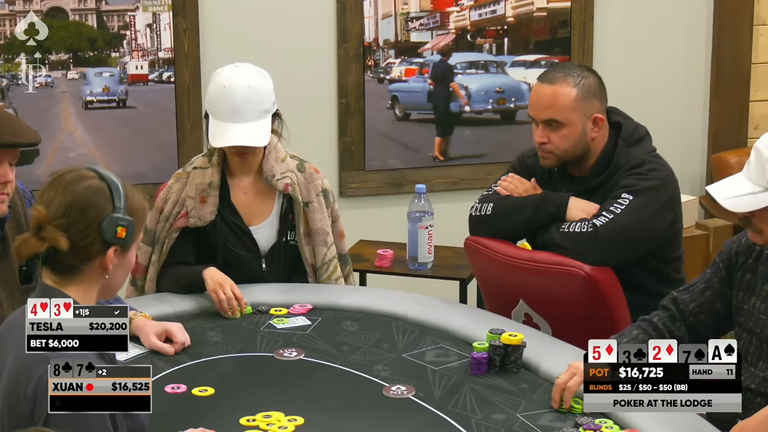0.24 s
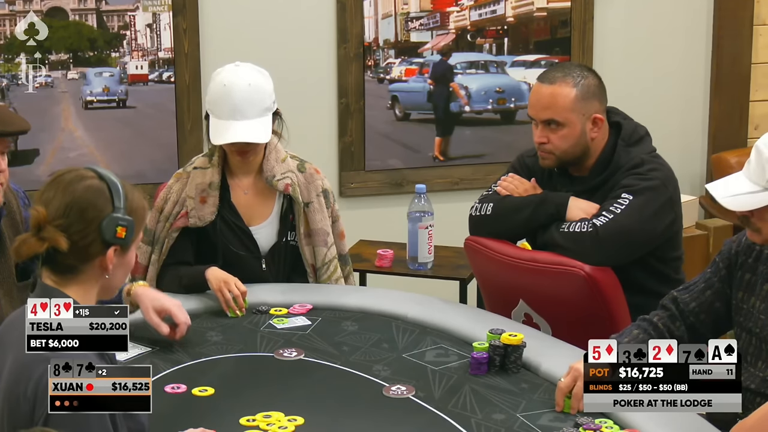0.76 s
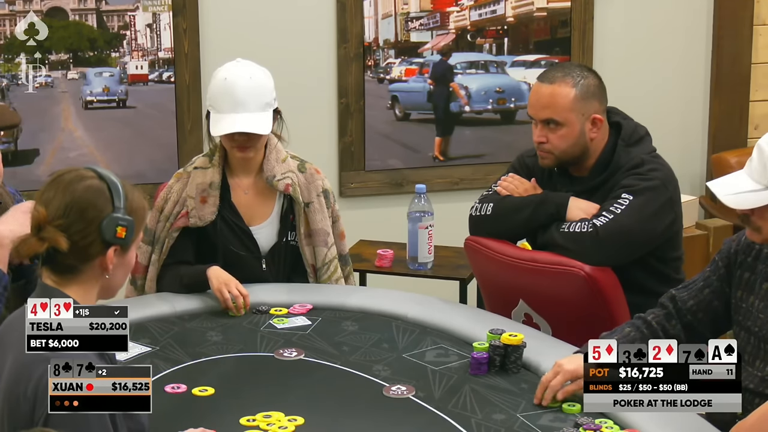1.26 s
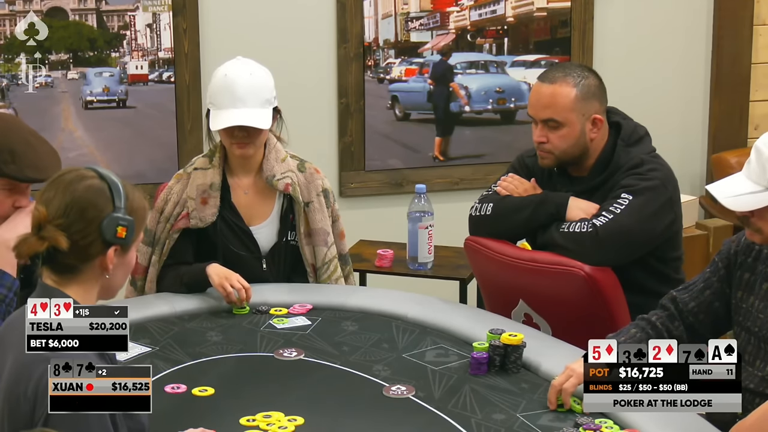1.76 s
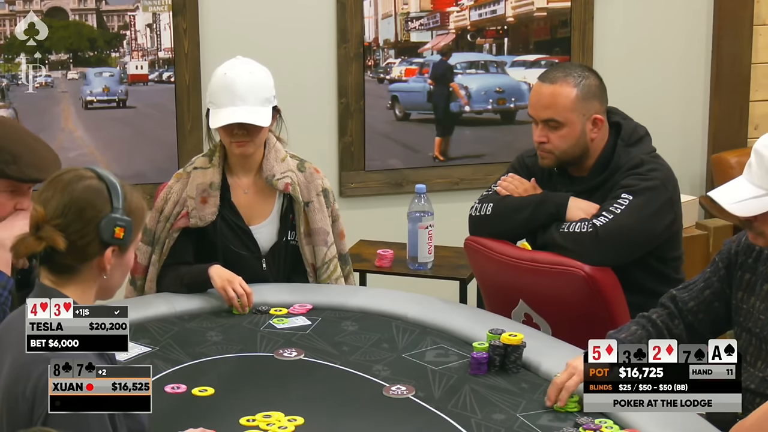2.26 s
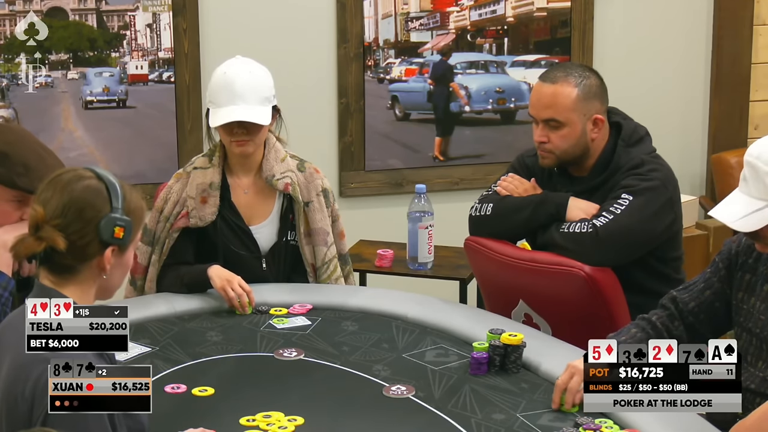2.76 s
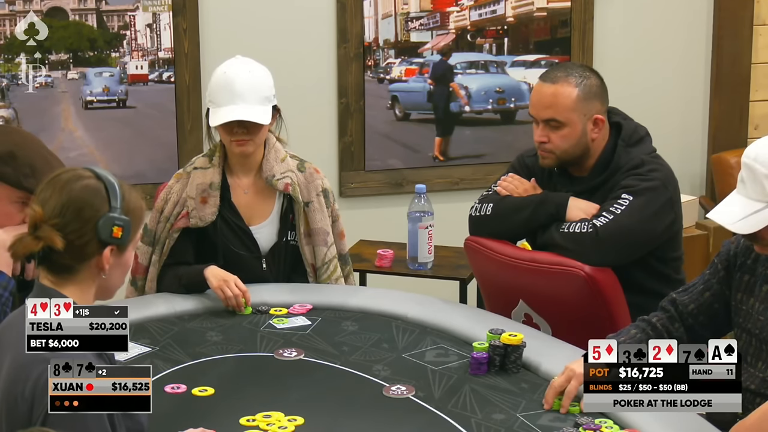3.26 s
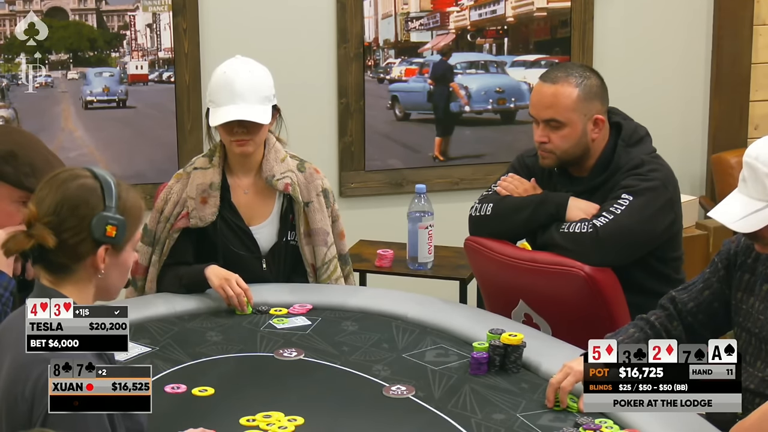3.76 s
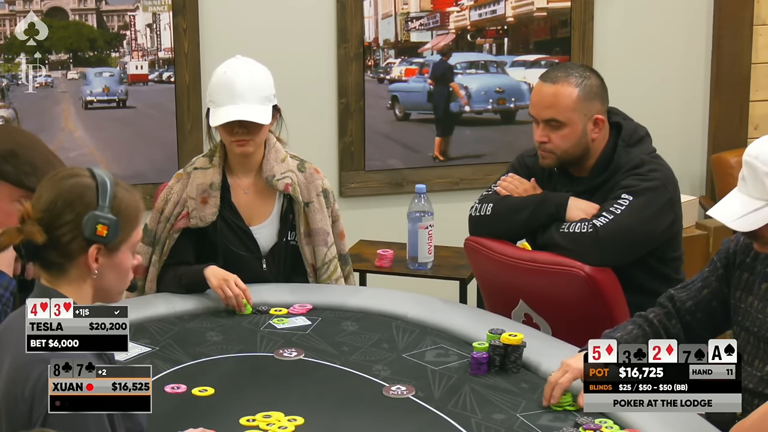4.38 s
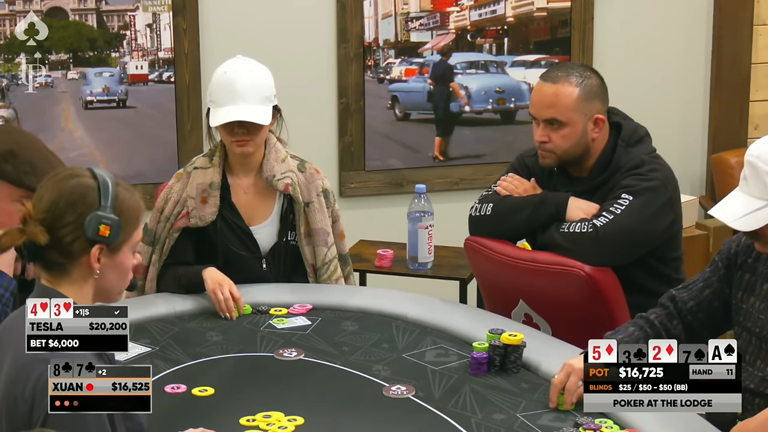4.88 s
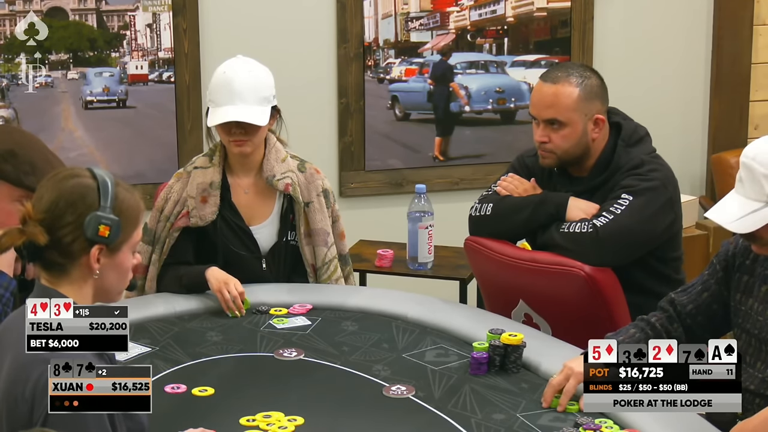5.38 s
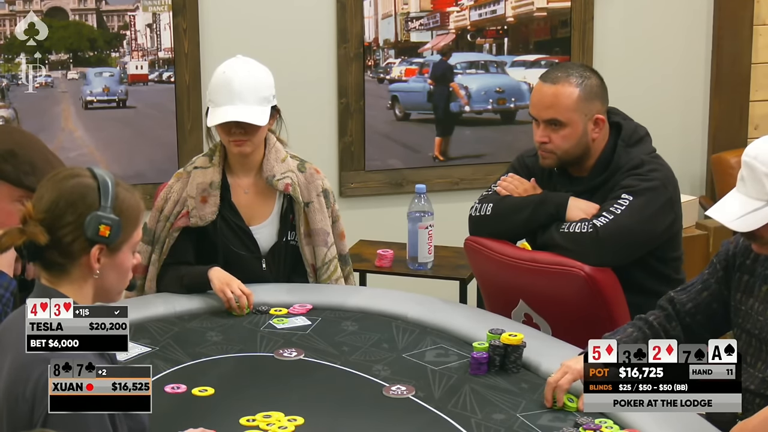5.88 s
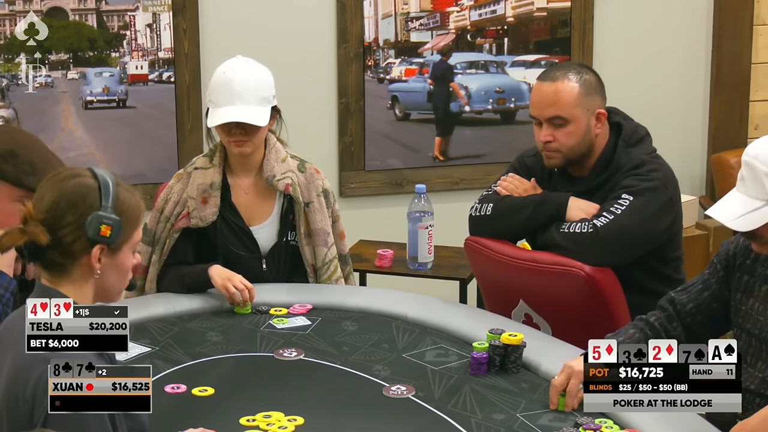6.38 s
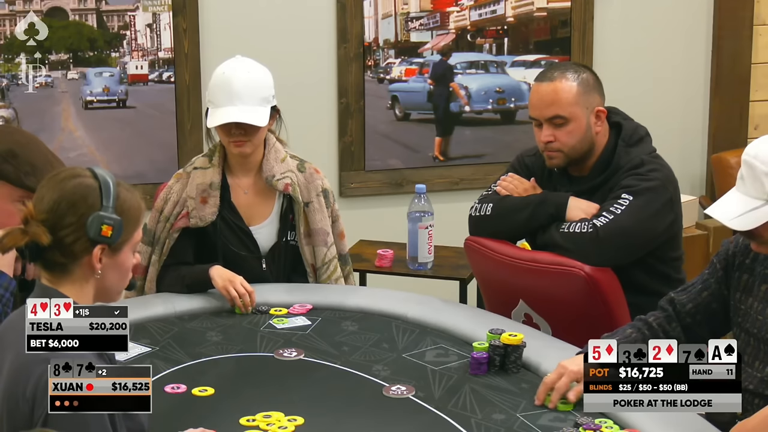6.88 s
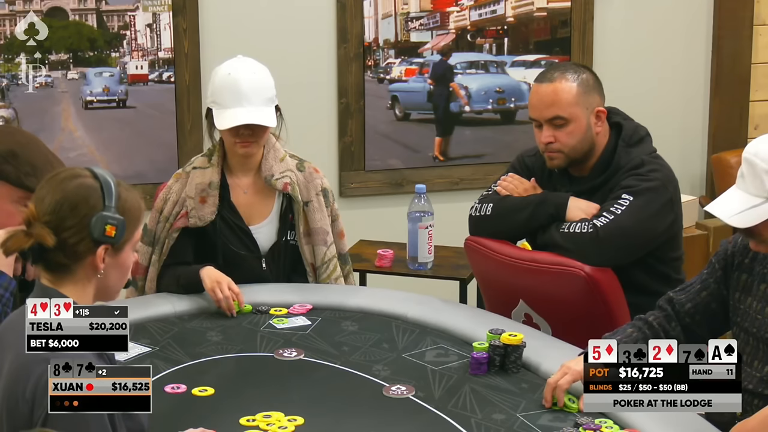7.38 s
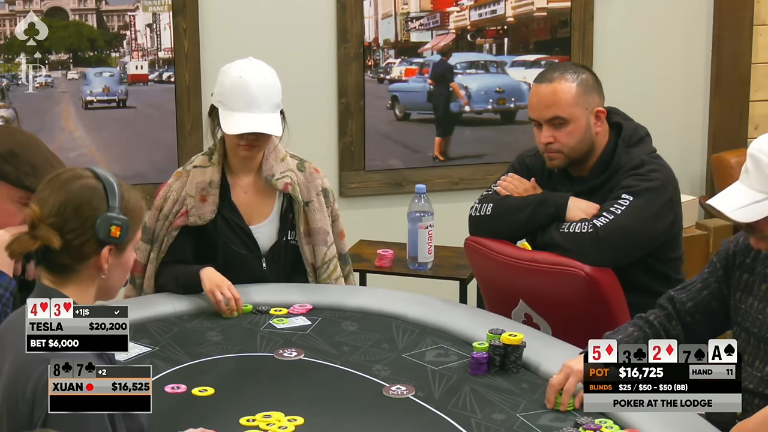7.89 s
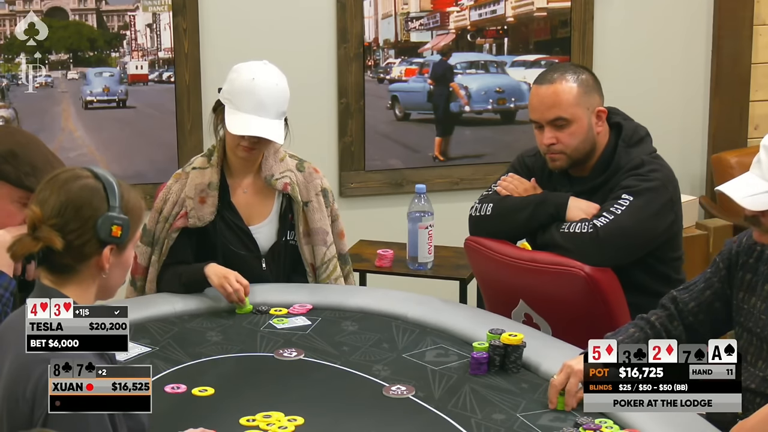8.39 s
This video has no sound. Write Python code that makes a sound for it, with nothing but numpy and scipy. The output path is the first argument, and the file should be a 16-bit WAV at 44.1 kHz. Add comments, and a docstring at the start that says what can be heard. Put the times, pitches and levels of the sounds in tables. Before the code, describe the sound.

Close, dry and centred, poker chips are handled on a padded felt table in a quiet room. A quick cluster of clicks opens at 0.2 s, a duller clack follows at 0.75, then clicks around 1.0 and a firm soft thud near 1.4. A loud clack at 2.05 comes with a small rattling scatter. From 2.2 to 3.8 there are mostly faint ticks, with a deep muffled thud at 3.05. Clicks return at 3.85, a strong dull clack at 4.3 trails tiny ticks, then a near pause. From 5.0 to 5.9 clacks and thuds crowd together with splaying chips. Light fingering follows around 6.1-6.5, a rattling drop at 6.8, low thuds near 7.05, and a busy run at 7.5-7.65. After a lull, a hard clack lands at 8.5. Faint ventilation and a wavering low hum swell briefly after thuds, beneath thin steady hiss.

```python
"""Clay poker chips are riffled, dropped and stacked on a felt table. Chip edges click and ring briefly as
damped sine modes, and stacks thud on the modes of the padded top. Shaped noise trails the blows, and dense
small ticks rattle as chips settle, scatter and are fingered. Ventilation noise and a wavering mains hum lie
over steady hiss; the background rises after the thuds and sinks again."""
import sys
import numpy as np
from scipy import signal
from scipy.io import wavfile

SR = 44100
rng = np.random.default_rng(int(sys.argv[2]) if len(sys.argv) > 2 else 0)


def master(y):
    """Save y as 16-bit WAV."""
    cut = np.clip(np.atleast_2d(y).T, -1, 1)
    pcm = np.round(cut * 32767)  # scale
    wavfile.write(sys.argv[1], SR, pcm.astype(np.int16))


def convert_level_to_amplitude(level_db):
    """Map a level in decibels to its linear amplitude factor."""
    exponent = np.asarray(level_db, float) / 20
    return 10 ** exponent


N = 381024

# chip on chip: start_s, body_db, brightness_db (edge over body modes), free_ring_db (3-5 kHz over body modes)
CHIP_CLICKS = [(0.1604, -33, -3, -4), (0.1844, -36.5, 1, 1), (0.191, -30.5, -4.5, -9),
               (0.205, -33, -17.5, -8), (0.377, -38.5, -12.5, -24), (0.4395, -40, -10.5, -22),
               (0.7418, -31, -52, -24), (0.7474, -24, -19.5, -32), (0.9746, -25, -0.5, -0.5),
               (1.0419, -31, 3, 2), (1.0575, -35.5, 1, -17), (1.0872, -42.5, 2, 8), (1.0935, -43, 3, 7),
               (1.3215, -35.5, -4, -1), (1.3558, -29, -1.5, -9), (1.3789, -26, -26, -14),
               (1.4587, -38.5, 0.5, -18), (1.5774, -31.5, -46, -17), (1.709, -38.5, -0.5, 0.5),
               (1.7414, -43, -3, 4), (1.8309, -41.5, -6.5, -4.5), (1.8794, -45.5, 4.5, 2),
               (1.959, -52.5, -7, 13.5), (2.0364, -27, -6, -29), (2.0488, -15.5, -6, -32),
               (2.2354, -35, -0.5, -15), (2.2763, -37, -8, -15), (2.522, -52, 8, -11), (2.59, -56.5, 7, -2),
               (2.628, -45, 4, -9), (2.648, -43, -30, -4), (2.7013, -42.5, -1, -1.5), (2.7753, -47, 8.5, 3),
               (2.796, -51.5, 9, -6), (3.0508, -43, -17, -13), (3.2296, -37, -36.5, -4.5),
               (3.3945, -49.5, 16, -1), (3.4093, -38, -31.5, -14), (3.535, -38, -62, -11.5),
               (3.8528, -30, -4, -9.5), (3.8917, -30.5, -4, -5), (4.2698, -29.5, -4.5, -9.5),
               (4.3016, -19, -12.5, -41), (4.3804, -42.5, 6, 8), (4.3963, -58, -5, 22),
               (4.4452, -40.5, -2, -3), (4.472, -51.5, 13, 7), (4.4793, -41.5, 6, 10), (4.5028, -44, 10, 1),
               (4.5184, -56, 29, 15.5), (4.9826, -37.5, -50, -26), (4.996, -31, -54, -10.5),
               (5.1896, -31.5, 6, -2), (5.2004, -26, 3.5, -17), (5.3617, -39, -32, -18),
               (5.372, -34, -18.5, -19), (5.4028, -23.5, -4.5, 1.5), (5.4145, -29, -14, -3),
               (5.4655, -37, -23, -3), (5.473, -29, -33, -15), (5.479, -31, -31, -16),
               (5.671, -21, -12.5, -20), (5.8668, -29, 2, -9), (5.8842, -33, 6, -1.5),
               (6.007, -39.5, -6, -20), (6.12, -44.5, 0, -7), (6.167, -44, 4, -7), (6.263, -37, -14, -4),
               (6.2743, -43, 1, 7.5), (6.286, -38, -22, 5.5), (6.354, -49.5, 3.5, 2),
               (6.4246, -50.5, 16, 4), (6.4433, -40, 3, -11), (6.7613, -43, 5.5, -15),
               (6.7935, -48.5, -8, 14), (6.8085, -30, -2, -3), (6.8192, -34, 10, -13),
               (6.9806, -32, -54, -30), (7.0807, -29, -61, -11.5), (7.4697, -33, -4, -10),
               (7.521, -27, 0, -9), (7.5436, -28.5, 3.5, -10), (7.6148, -32.5, 10, 1.5),
               (7.6182, -18.5, -23, -28), (7.6685, -34, -15, -19), (7.9524, -35, -8.5, -5),
               (8.195, -69, 27.5, 15), (8.24, -75, 31, 2), (8.345, -46, 3, 10.5), (8.4956, -23.5, -6, -17),
               (8.5015, -29.5, 11, -20), (8.5057, -20, -22, -31), (8.524, -14.5, -14, -16)]
# stack on felt: start_s, low_db, hardness_db (upper over low modes), rumble_db (liveliness of the top after it)
STACK_THUDS = [(0.158, -43.5, -5.5, 14), (0.184, -40.5, 5, -22), (0.691, -51.5, -0.5, -17),
               (0.749, -38.5, -12, 8), (0.975, -37, 4, -2), (1.041, -37.5, -3.5, -0.5),
               (1.353, -26.5, -30, 4.5), (1.386, -16.5, -12.5, -6), (1.857, -43.5, -15.5, -31),
               (2.019, -50.5, 10, 3), (2.036, -28.5, -13, 5), (2.215, -33.5, -14, -14),
               (2.647, -44.5, -14, -9.5), (3.042, -19.5, -39.5, 6), (3.458, -42.5, -20, -10.5),
               (3.852, -42.5, 8.5, 6.5), (4.274, -38.5, -11.5, 2.5), (4.997, -36.5, -23, -4.5),
               (5.185, -27.5, -18.5, 7), (5.227, -29, -22, -24), (5.402, -52.5, 4, 17.5),
               (5.67, -21, -16.5, -1.5), (5.868, -28.5, -1.5, 1), (6.818, -29, -9, 3),
               (7.024, -30.5, -16.5, -1.5), (7.035, -21.5, -53, 8.5), (7.065, -36, -14, -9),
               (7.115, -35, -30, -19), (7.471, -37.5, -4.5, 6.5), (7.5212, -37.5, 5, 1),
               (7.545, -39, 3, -13), (7.57, -21.5, -17, -22), (7.607, -31.5, -19, -16),
               (7.616, -21.5, -13.5, -9), (8.524, -28.5, 0.5, -3.5), (8.604, -32, -25, -14)]
# ringing modes of a chip: pitch_hz, level_db, t60_s
CHIP_MODES = [(1897, -6, 0.007), (2240, 1.5, 0.0055), (2570, -3, 0.0045), (3618, -5, 0.025),
              (3720, -4, 0.014), (4200, -1, 0.004), (5200, -6, 0.004), (6450, -13, 0.018),
              (8655, -8, 0.008), (9830, -4, 0.007), (11110, -5, 0.005), (13900, -14, 0.005)]

# dB of tail gained per dB of click, for the noise tail and the settling rattle
CLICK_TAIL_FOLLOWS = 0.64


def drift(corner_hz):
    """Slow random wander of rms 1: coarse noise through a double one-pole low-pass."""
    step = 40  # samples between coarse points
    pole = np.exp(-2 * np.pi * step * corner_hz / SR)
    white = rng.standard_normal(N // step + 2002)
    slow = signal.lfilter([1], [1, -2 * pole, pole * pole], white)[2000:]  # drop the filter's start
    slow = slow / np.sqrt(np.mean(slow ** 2) + 1e-20)
    return np.interp(np.arange(N) / step, np.arange(len(slow)), slow)


def ring(clicks, hz, t60_s):
    """Two-pole resonator: a unit click sets a decaying sine of height 1 ringing."""
    radius = convert_level_to_amplitude(-60 / (t60_s * SR))
    angle = 2 * np.pi * hz / SR
    return signal.lfilter([0, np.sin(angle)], [1, -2 * radius * np.cos(angle), radius ** 2], clicks + 1e-18)


def band_filter(x, low_hz, high_hz):
    """Butterworth band-pass."""
    return signal.sosfilt(signal.butter(2, [low_hz, high_hz], "band", fs=SR, output="sos"), x)


def noise_bands(colour):
    """Coloured noise as (centre Hz, band) pairs, each under half an octave wide; the sum has rms 1."""
    hz, db = np.transpose(colour)
    edges = np.geomspace(hz[0], hz[-1], int(2.5 * np.log2(hz[-1] / hz[0])))
    white = rng.standard_normal((2, N))  # alternated, so that neighbouring bands are independent
    bands = []
    for k, (low_hz, high_hz) in enumerate(zip(edges, edges[1:])):
        centre_hz = np.sqrt(low_hz * high_hz)
        gain = convert_level_to_amplitude(np.interp(np.log(centre_hz), np.log(hz), db))
        bands.append((centre_hz, band_filter(white[k % 2], low_hz, high_hz) * gain))
    total = np.std(sum(band for _, band in bands))
    return [(centre_hz, band / total) for centre_hz, band in bands]


def tail_level(events, tail_db, follows, tilt, fall_db_per_s, rise_s, lively=0):
    """Gain over time: each blow starts a rise to a level set by its strength, then a steady dB fall."""
    t = np.arange(0, N, 64) / SR
    power = 0
    for start_s, db, bright_db, lively_db in events:
        age_s = np.maximum(t - start_s, 0)
        blow_db = 30 + db + tilt * bright_db  # relative to a blow of -30 dB
        level_db = tail_db + follows * blow_db + lively * lively_db - fall_db_per_s * age_s
        power = power + (convert_level_to_amplitude(level_db) * (1 - np.exp(-age_s / rise_s))) ** 2
    return np.interp(np.arange(N) / SR, t, np.sqrt(power))


def strike(events, modes, dull_hz, bright_hz, free_hz, spread_db, detune, bounce_s, bounce_db, lead, drag, count):
    """Each blow is a quick run of contacts that swells and fades, exciting modes tilted by its brightness."""
    rows = np.array(events)
    start_s, body_db, bright_db, free_db = np.split(rows, 4, axis=1)
    out = np.zeros(N)
    chance = rng.random((len(rows), count))
    # the dullest blows drag out into a short scrape
    bounce_s = bounce_s * (1 + drag * np.clip(-bright_db - 15, 0, 20) / 20)
    lags_s = np.cumsum(bounce_s * (.5 + chance), axis=1) - bounce_s * (1.2 + chance[:, :1])
    at = np.minimum(((start_s + lags_s) * SR).astype(int), N - 1)
    contact_db = bounce_db * np.abs(np.arange(count) - lead)
    for hz, db, t60_s in modes:
        tilt = np.clip(np.log(hz / dull_hz) / np.log(bright_hz / dull_hz), 0, 1)
        colour_db = free_db if free_hz[0] < hz < free_hz[1] else tilt * bright_db
        level_db = body_db + colour_db + db + contact_db
        draw = rng.standard_normal((len(rows), count, 2))
        sizes = convert_level_to_amplitude(level_db + spread_db * draw[..., 0]) * np.sign(draw[..., 1])
        # how a thing is held or stacked shifts its pitch a little
        grip = rng.integers(-1, 2, len(rows))
        # contacts last long enough to round the edge
        soft = signal.butter(2, min(1.59 * hz, .45 * SR), fs=SR)
        for shift in (-1, 0, 1):
            clicks = np.zeros(N)
            np.add.at(clicks, at[grip == shift], sizes[grip == shift])
            out += ring(signal.lfilter(*soft, clicks), hz * (1 + detune * shift), t60_s)
    return out


def chip_clicks():
    """Chip on chip: short ringing modes, high-passed as a small disc sends out no bass."""
    chips = strike(CHIP_CLICKS, CHIP_MODES, dull_hz=2800, bright_hz=5960, free_hz=(3000, 5000), spread_db=3.0,
                   detune=0.043, bounce_s=0.0015, bounce_db=-5.5, lead=0.78, drag=1.2, count=5)
    return signal.sosfilt(signal.butter(2, 500, "high", fs=SR, output="sos"), chips)


def table_thuds():
    """Stack on felt: a soft contact on a small top, so no edge and no deep bass."""
    # modes of the padded top: pitch_hz, level_db, t60_s
    top_modes = [(301, -25.5, 0.089), (396, -8, 0.044), (607, 1.5, 0.026), (862, 6.5, 0.015),
                 (1126, 9, 0.016)]
    table = strike(STACK_THUDS, top_modes, dull_hz=510, bright_hz=1050, free_hz=(0, 0), spread_db=3.0,
                   detune=0.082, bounce_s=0.00192, bounce_db=-3.5, lead=0.39, drag=0.23, count=3)
    return band_filter(table, 180, 1800)


def scatter_level():
    """Gain over time of chips scattering as a stack splays out."""
    # splaying stacks: start_s, level_db (scaled by lively below)
    splays = [(.185, -72), (.75, -69.5), (1.36, -60), (2.018, -53), (3.86, -66), (5.194, -55), (5.872, -52),
              (6.816, -49.5), (7.472, -67.5)]
    events = [(start_s, 0, 0, db) for start_s, db in splays]
    return tail_level(events, 0, 0, 0, fall_db_per_s=148, rise_s=0.002, lively=0.9)


def rattle(ticks_per_s, settle_db):
    """Dense random ticks into damped chip modes, as chips settle or scatter and fingers work them."""
    # fingers working the chips: start_s, end_s, tick_db
    fingering = [(1.952, 2.062, -54.5), (2.51, 2.57, -63), (4.298, 4.423, -62), (4.856, 5.09, -79),
                 (5.52, 5.56, -58.5), (5.613, 5.66, -60.5), (6.113, 6.23, -66.5), (6.35, 6.467, -68.5),
                 (6.758, 6.817, -61), (8.345, 8.404, -66.5)]
    t = np.arange(N) / SR
    level = tail_level(CHIP_CLICKS, settle_db, CLICK_TAIL_FOLLOWS, 0.32, fall_db_per_s=170.0, rise_s=0.00063)
    level = level + convert_level_to_amplitude(-5.5) * scatter_level()
    for start_s, end_s, tick_db in fingering:
        level = level + convert_level_to_amplitude(tick_db) * ((t > start_s) & (t < end_s))
    tick_sizes = convert_level_to_amplitude(3.91 * np.minimum(rng.exponential(1, N), 4))
    ticks = (rng.random(N) < ticks_per_s / SR) * tick_sizes
    grip = rng.integers(-1, 2, N)
    out = 0
    for hz, db, t60_s in CHIP_MODES:
        sizes = ticks * level * convert_level_to_amplitude(db) * rng.standard_normal(N)
        for shift in (-1, 0, 1):
            # neighbouring chips shorten the ring
            out = out + ring(sizes * (grip == shift), hz * (1 + 0.058 * shift), 0.44 * t60_s)
    return out


def tails():
    """Grainy noise: the table rumbles after thuds, the room answers clicks; the treble dies sooner."""
    # tail spectrum: pitch_hz, density_db (per Hz)
    tail_spectrum = [(88, -7), (150, -27), (205, -11), (1200, -5.5), (1680, -27), (2200, 1), (4300, -16),
                     (5000, -12.5), (6600, -9), (9360, -20.5), (15500, -40)]
    # for a blow of -30 dB, ahead of the overall gain
    thud_tail_db, click_tail_db = -40.5, -61.5
    grain = drift(67)
    scatter = scatter_level()
    out = 0
    for hz, band in noise_bands(tail_spectrum):
        fall_db_per_s = 147.4 * (hz / 1500) ** 0.19
        thud_db = thud_tail_db - 11.2 * max(np.log2(hz / 1200), 0)
        thud_tilt = np.clip(np.log2(hz / 400), 0, 1) * 1.12
        level = tail_level(STACK_THUDS, thud_db, 0.43, thud_tilt, fall_db_per_s, rise_s=0.00067, lively=0.64)
        if hz > 1400:
            click_tilt = np.clip(0.33 * np.log2(hz / 2600), 0, 1)
            click_level = tail_level(CHIP_CLICKS, click_tail_db, CLICK_TAIL_FOLLOWS, click_tilt,
                                     fall_db_per_s, rise_s=0.0027)
            level = np.hypot(level, click_level)
            level = np.hypot(level, scatter * convert_level_to_amplitude(1.7 * np.log2(hz / 4000)))
        out = out + band * level * convert_level_to_amplitude(4.4 * drift(32) + 2.4 * grain)
    return convert_level_to_amplitude(3.5) * out


def room_tone():
    """Ventilation noise and a wavering mains hum; the background rises after thuds and sinks back to rest."""
    # shared level at rest, ahead of the hum and air gains: start_s, level_db
    rest_curve = [(0, -68), (1.7, -64), (1.93, -69), (4.2, -67.5), (4.5, -83), (4.72, -67), (6.1, -65),
                  (6.52, -79), (6.701, -67), (8.42, -68.5)]
    # ventilation spectrum: pitch_hz, density_db (per Hz)
    air_spectrum = [(20, -24), (49, -20), (126, 1), (177, -5.5), (622, -6), (1680, -19.5), (2420, -15),
                    (15500, -69)]
    s, db = np.transpose(rest_curve)
    rest = convert_level_to_amplitude(np.interp(np.arange(N) / SR, s, db))
    swell = tail_level(STACK_THUDS, -46.5, 0.89, 0.47, fall_db_per_s=52, rise_s=0.018, lively=0.99)
    level = np.hypot(rest, swell)
    turns = np.cumsum(119.5 + 2.78 * drift(14.8)) / SR  # wavering pitch in Hz, summed to cycles
    hum = np.sqrt(2) * np.sin(2 * np.pi * turns) * level * convert_level_to_amplitude(-5.0 + 2.0 * drift(3))
    air = sum(band * convert_level_to_amplitude(2.7 * drift(24)) for _, band in noise_bands(air_spectrum))
    return hum + air * convert_level_to_amplitude(-15.5) * level ** 0.74  # the air swells less than the hum


def microphone_hiss():
    """Steady treble hiss: white noise of -78 dB rms cut to a band."""
    return band_filter(convert_level_to_amplitude(-78) * rng.standard_normal(N), 5000, 13500)


def scene():
    """Chips, table and room, the same in both channels."""
    blows = chip_clicks() + table_thuds()
    trails = rattle(ticks_per_s=700, settle_db=-60.5) + tails()
    mid = blows + trails + room_tone() + microphone_hiss()
    return np.array([mid, mid])


def roll_off(x):
    """The treble ends steeply here."""
    return signal.sosfilt(signal.butter(12, 15700, fs=SR, output="sos"), x)


def record(dry):
    """The microphone halves a narrow treble band around 7.5 kHz."""
    peak = signal.lfilter(*signal.iirpeak(7500, 5.0, fs=SR), dry)
    return roll_off(dry - .5 * peak)


dry = scene()
out = record(dry)
master(out)
```